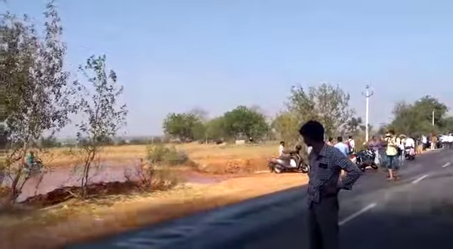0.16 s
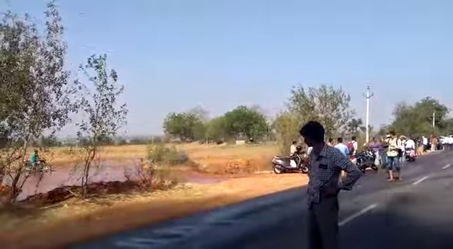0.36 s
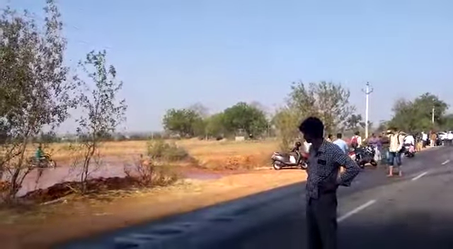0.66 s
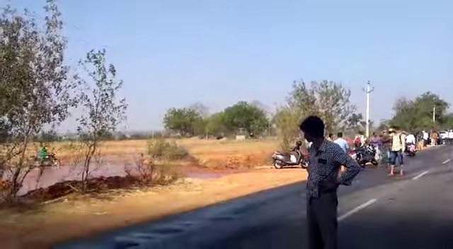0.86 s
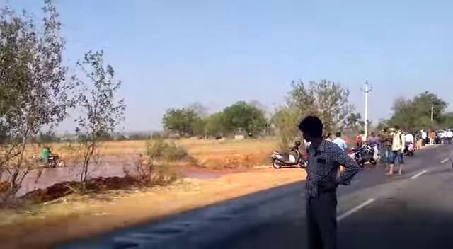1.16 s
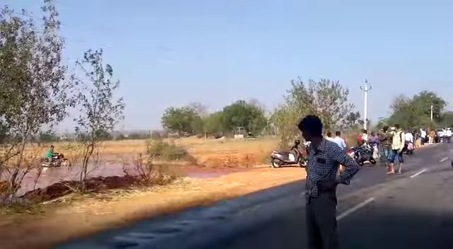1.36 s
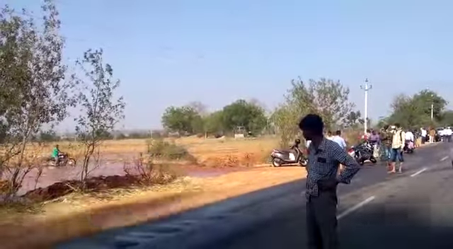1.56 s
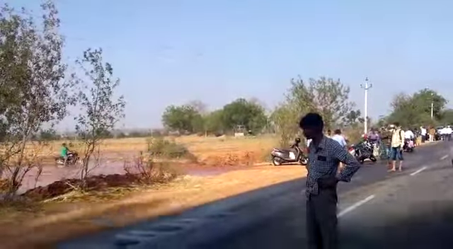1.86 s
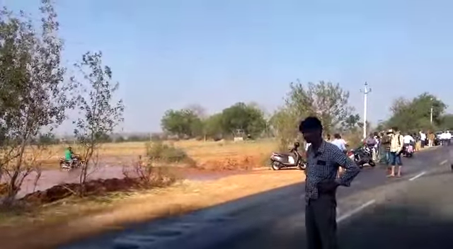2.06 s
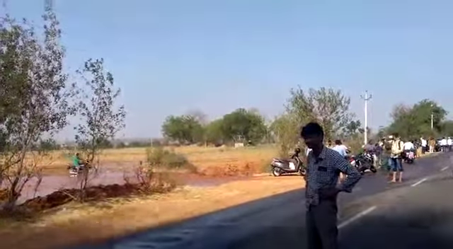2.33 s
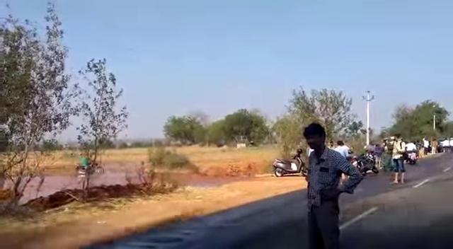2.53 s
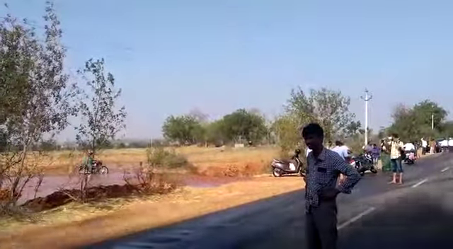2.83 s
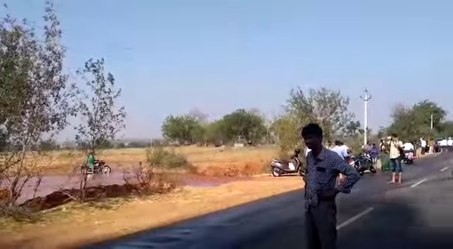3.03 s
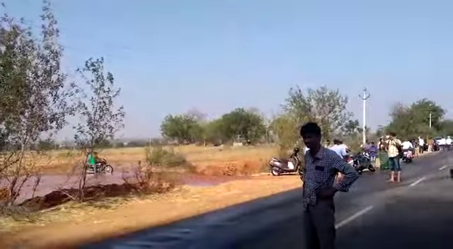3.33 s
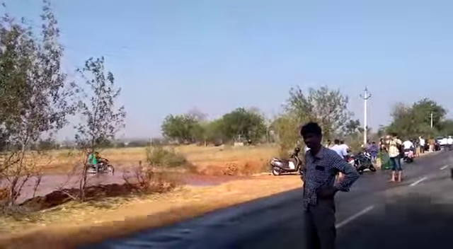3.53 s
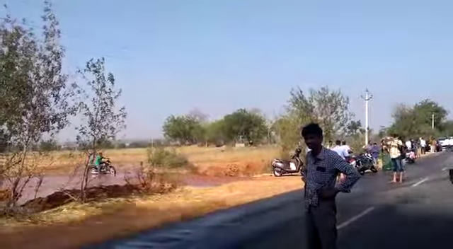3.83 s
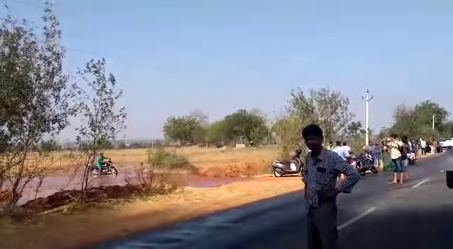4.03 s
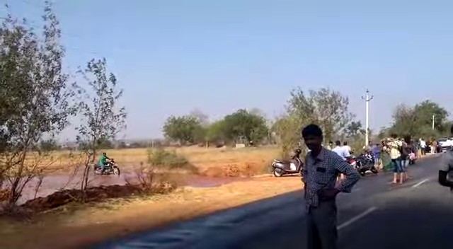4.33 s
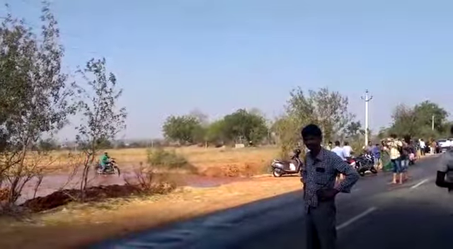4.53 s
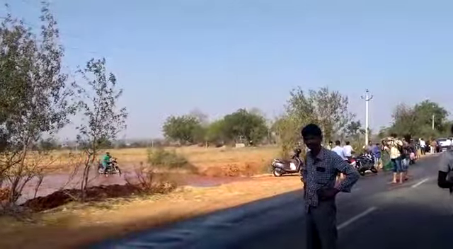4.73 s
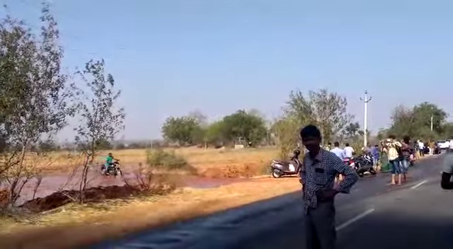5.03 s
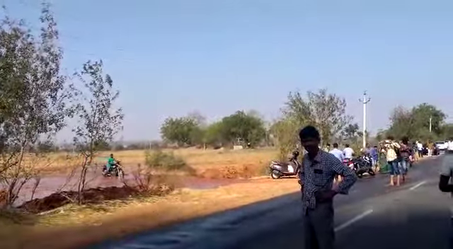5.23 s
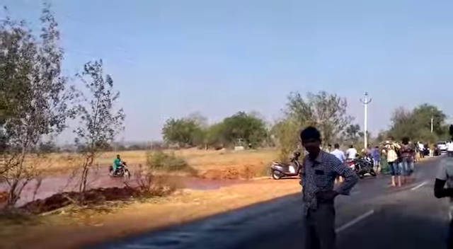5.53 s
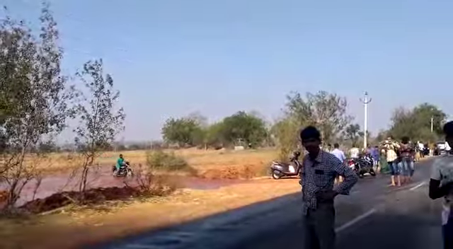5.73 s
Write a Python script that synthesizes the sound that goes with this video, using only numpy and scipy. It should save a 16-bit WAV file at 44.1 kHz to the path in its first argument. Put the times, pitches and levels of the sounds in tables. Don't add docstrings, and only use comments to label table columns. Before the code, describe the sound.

A burst water main roars steadily across an open field, heard from the roadside on a hand-held phone: a dense, noisy rush like a waterfall, full in the low mids with a bright, hissing spray on top, flickering and surging in short swells. From about 0.2 to 2.4 seconds, gusts batter the microphone with deep rounded thuds, quick slaps and brief whipping swishes, clustered at 0.25-0.7, 1.0-1.4 and 2.0-2.4. The rush dips after strong gusts, most deeply at 2.4, then creeps back over about a second. A short low splat falls near 1.75. From 3 to 5.4 the wind is mostly quiet and the water is clear and fuller, swelling around 4.1 and 4.7, with a faint splat at 4.1, a softer one at 4.6, the loudest hollow one at 4.7 and another at 5.2. Wind slaps again at 5.5, with lighter buffeting to the end.

```python
import sys
import numpy as np
from scipy import signal
from scipy.fft import rfft, irfft, next_fast_len
from scipy.io import wavfile
from scipy.ndimage import uniform_filter1d

SR = 44100
rng = np.random.default_rng(int(sys.argv[2]) if len(sys.argv) > 2 else 0)


def file_out(sig):
    cols = np.atleast_2d(sig).T
    lim = np.clip(cols, -1, 1)
    pcm = np.round(lim * 32767).astype(np.int16)
    wavfile.write(sys.argv[1], SR, pcm)


def boost_factor(decibels):
    exponent = np.asarray(decibels, float) / 20
    return 10 ** exponent


N = 259881
SIZE = next_fast_len(N + 4096)
HZ = np.maximum(np.arange(SIZE // 2 + 1) * SR / SIZE, 1.)
COARSE_S = np.arange(0, N / SR + .002, .002)

PORT_LAG_S, PORT_TURN_RAD = .000409, .52
LATE = -np.exp(-2j * np.pi * HZ * PORT_LAG_S - 1j * PORT_TURN_RAD * HZ / (HZ + 500))


def along_hz(table):
    hz, value = np.transpose(table)
    return np.interp(np.log(HZ), np.log(hz), value)


def along_time(table):
    s, *columns = np.transpose(table)
    return [np.interp(np.arange(N) / SR, s, column) for column in columns]


def unit(x):
    return x / np.sqrt(np.mean(x ** 2))


def walk(rate_hz):
    hold = int(SR / rate_hz)
    steps = np.repeat(rng.standard_normal(N // hold + 1), hold)
    slewed = uniform_filter1d(uniform_filter1d(steps, hold), hold)[:N]
    return unit(slewed - uniform_filter1d(slewed, size=4 * hold))


def cross(front, rear):
    return np.array([rear + LATE * front, front + LATE * rear])


def front_only(front, left_db):
    late = irfft(rfft(front) * LATE, SIZE)
    return np.array([boost_factor(left_db) * late, front])


# start_s (middle of swell), rush_db, fine_spray_db, half_length_s
SURGES = [(.344, 2, 0.5, 0.045), (0.483, 2.5, -1, 0.055), (0.635, 0, 1.5, 0.031), (0.927, 1.5, 0.5, 0.088),
          (1.03, -0.5, 2.5, .04), (1.398, 0.5, 2, .2), (1.687, 1.5, 2.5, 0.017), (1.833, 1, 1, 0.12),
          (2.1, 0.5, 0.5, 0.035), (2.286, 3, -1.5, 0.057), (2.72, 2, -2, 0.029), (2.893, 1, 0, .08),
          (3.498, 0.5, 0, .1), (3.82, 2, -1, 0.085), (4.045, 4.5, -2, 0.025), (4.121, 5, -1.5, 0.016),
          (4.21, -0.5, -0.5, 0.046), (4.422, 2, -1, 0.072), (4.604, 0, -0.5, 0.02), (4.932, 2, 0, 0.018),
          (4.709, 4.5, -3, 0.013), (4.82, -1, 0, .03), (5.177, 2, -2, 0.12), (5.71, 3.5, -1, 0.071),
          (5.86, 3.5, -0.5, 0.031)]
RUSH_DB, SPRAY_DB = -24.5, 2.5


def surging():
    s, rush_db, spray_db, half = np.transpose(SURGES)
    swell = np.exp(-.5 * ((COARSE_S[:, None] - s) / half) ** 2)
    return along_time(np.c_[COARSE_S, RUSH_DB + swell @ rush_db, SPRAY_DB + swell @ spray_db])


# start_s, gain_db it drops to
DUCKS = [(-.05, -4), (.22, -4), (.39, -6), (.56, -5), (.65, -5.5), (1.0, -3.5), (1.135, -6), (1.19, -7.5),
         (1.25, -6), (1.76, -6), (1.95, -4), (2.18, -6), (2.395, -12), (2.45, -11.5), (5.465, -5),
         (5.53, -6)]
DUCK_S, RECOVER_DB_PER_S = 0.01, 11


def ducking():
    s, db = np.transpose(DUCKS)
    since = COARSE_S[:, None] - s
    recovering_db = np.minimum(db + RECOVER_DB_PER_S * since, 0)
    deepest_db = np.where(since < 0, 0, recovering_db).min(axis=1)
    gain_db = along_time(np.c_[COARSE_S, deepest_db])[0]
    keep = np.exp(-1 / (DUCK_S * SR))
    return signal.lfilter([1 - keep], [1, -keep], gain_db - gain_db[0]) + gain_db[0]


def splashes(rate_hz, spread_db, drops_db):
    hit, size = rng.random(SIZE), rng.exponential(size=SIZE)
    sign, blur = rng.standard_normal(SIZE), rng.standard_normal(SIZE)
    drops = (hit < rate_hz / SR) * boost_factor(spread_db * np.minimum(size, 3.5)) * np.sign(sign)
    return rfft(blur + boost_factor(drops_db) * unit(drops))


# pitch_hz, level_db (per Hz)
RUSH_COLOUR = [(30, -30), (60, -1), (150, 6), (300, 4.5), (600, 2), (1500, 1), (2500, 0.5), (4500, -3),
               (7000, -3), (9000, 0.5), (11000, 3.5), (12300, 1), (13200, -2.5), (14300, -7)]
# pitch_hz, share_0_to_1
ALIKE = [(40, .1), (120, .4), (300, .7), (700, .65), (1100, .6), (1600, .25), (2300, .02), (5000, .03),
         (15000, .02)]
# pitch_hz, share_0_to_1
SCATTERED = [(40, 0.34), (300, 0.18), (1200, .03), (2500, 0.05), (3600, 0.13), (4300, 0.33), (5000, 0.08),
             (6000, 0.17), (7000, 0.49), (9000, 0.62), (15000, 0.2)]
# pitch_hz, share_0_to_1
REAR = [(60, .75), (300, 0), (900, 0.33), (1700, 0), (2900, 0.69), (4100, 0), (5300, 0), (8000, 0.24),
        (15000, 0)]
# pitch_hz, left_minus_right_db
SHADE = [(60, 11.5), (110, -1.5), (200, -5), (370, -3), (680, -3), (1250, 0), (2290, -2.5), (3500, -3),
         (4100, -5.5), (7690, -6), (14100, -6.5)]


def water():
    flow_db, spray_db = surging()
    alike = np.clip(along_hz(ALIKE), 0, 1)
    loose = np.clip(along_hz(SCATTERED), 0, 1 - alike)
    behind = np.clip(along_hz(REAR), 0, 1)
    front, rear, both, left, right = (splashes(rate_hz=900, spread_db=3.5, drops_db=-12.0) for _ in range(5))
    direct = cross(np.sqrt(1 - behind) * front, np.sqrt(behind) * rear)
    direct = np.sqrt(np.maximum(1 - alike - loose, 0)) * direct
    ports = np.sqrt(alike) * both + direct + np.sqrt(loose) * np.array([left, right])
    shade_db = along_hz(SHADE)
    ports = ports * boost_factor(along_hz(RUSH_COLOUR) + np.array([shade_db, -shade_db]) / 2)
    out, surge, near = 0, walk(40), walk(28)
    for centre_hz in 50 * 2 ** (np.arange(18) / 2):
        octaves = np.log2(np.maximum(HZ, 50) / centre_hz)
        window = np.cos(np.pi * np.clip(octaves, -.5, .5))
        near = unit(0.8 * near + 0.6 * walk(28))
        spray = np.clip(np.log2(centre_hz / 6000.) / .7, 0, 1)
        gain_db = 0.3 * surge + .4 * near + 0.55 * walk(30) + spray * (spray_db - 2.0)
        out = out + boost_factor(gain_db) * irfft(ports * window ** 2, SIZE)[:, :N]
    return unit(out) * boost_factor(flow_db + ducking() + 5.0)


def tents(rows, rise_db, fall_db, floor_db):
    s, db = np.transpose(rows)
    since = COARSE_S[:, None] - s
    each_db = db - np.maximum(-rise_db * since, fall_db * since)
    peaks_db = 10 * np.log10(np.sum(boost_factor(2 * each_db), axis=1) + 1e-12)
    peaks_db = along_time(np.c_[COARSE_S, peaks_db])[0]
    return 10 * np.log10(boost_factor(2 * peaks_db) + boost_factor(2 * floor_db))


def gust(colour, level_db, flutter_hz, flutter_db, even, rear_db, left_db):
    tint = boost_factor(along_hz(colour))
    front, rear = (unit(irfft(rfft(rng.standard_normal(SIZE)) * tint, SIZE)) for _ in range(2))
    swing = np.sqrt(uniform_filter1d(uniform_filter1d(front ** 2, size=900), size=900) + 1e-3)
    front = unit(front / swing ** even)
    ports = (front_only(front, left_db) + boost_factor(rear_db) * rear)[:, :N]
    return ports * boost_factor(level_db + flutter_db * walk(flutter_hz))


# pitch_hz, level_db (per Hz)
THUD_COLOUR = [(15, -48), (30, -20), (60, -5), (110, 0), (170, -2.5), (280, -11), (480, -26), (1200, -55)]
# start_s, level_db
BREEZE = [(0, -27), (.16, -23), (.3, -29), (.73, -22), (.83, -30), (.99, -29), (1.1, -26), (1.26, -27.5),
          (1.5, -20), (1.75, -27), (1.92, -25.5), (2.08, -23), (2.44, -26), (2.56, -33), (2.73, -26),
          (3.06, -42), (4.6, -43), (5.89, -24.5)]
WAKE_DB, WAKE_DB_PER_S = -10, 253


def thuds():
    wakes = [(s, db + WAKE_DB) for s, db, hz in SLAPS]
    level_db = tents(wakes, WAKE_DB_PER_S, WAKE_DB_PER_S, along_time(BREEZE)[0])
    return gust(THUD_COLOUR, level_db, flutter_hz=40, flutter_db=1.5, even=.9, rear_db=-19, left_db=-1.2)


# start_s (middle of slap), peak_db, pitch_hz
SLAPS = [(0.256, -5.5, 120), (0.307, -9.7, 110), (0.35, -7.3, 130), (0.398, -8.9, 170), (0.47, -8.3, 200),
         (0.52, -7.1, 110), (0.586, -11.5, 120), (0.621, -8.4, 170), (0.655, -7.1, 190), (1.031, -8.5, 160),
         (1.136, -5.4, 230), (1.175, -6.9, 180), (1.322, -7.6, 120), (1.378, -12.1, 160),
         (1.557, -10.1, 130), (1.791, -6.5, 140), (2.055, -6.7, 140), (2.138, -10.2, 130),
         (2.183, -6.2, 140), (2.234, -6.4, 190), (.865, -14, 110), (2.388, -7, 130), (2.403, -3.5, 220),
         (5.486, -6.7, 160), (5.52, -10.9, 160), (2.965, -15, 110), (4.175, -20, 120), (4.93, -13, 100),
         (5.41, -15, 130), (5.665, -14, 170)]


def slaps(cycles, left_db):
    front, busy, t = np.zeros(SIZE), np.zeros(SIZE), np.arange(SIZE) / SR
    for (s, db, hz), turn in zip(SLAPS, rng.random((len(SLAPS), 1))):
        near = slice(int((s - .04) * SR), int((s + .04) * SR))
        since = t[near] - s
        hump = np.exp(-.5 * (since * hz / cycles) ** 2)
        front[near] += boost_factor(db) * hump * np.cos(2 * np.pi * (hz * since + turn))
        busy[near] = np.maximum(busy[near], hump)
    return front_only(front, left_db)[:, :N], busy[:N]


# pitch_hz, level_db (per Hz)
SWISH_COLOUR = [(120, -7), (250, -1), (330, -1.5), (500, -4), (800, -18), (1300, -19), (3000, -51)]
# start_s (moment of peak), peak_db
WHIPS = [(.27, -32), (.38, -41), (.469, -28), (.663, -21.5), (1.03, -45), (1.127, -20.5), (1.18, -27.5),
         (1.43, -29), (1.686, -36), (1.8, -52), (2.03, -28), (2.13, -34), (2.22, -28.5), (2.4, -24.5),
         (2.72, -45), (5.5, -27.5), (5.66, -36)]


def whips():
    level_db = tents(WHIPS, rise_db=267, fall_db=298, floor_db=-58.5)
    return gust(SWISH_COLOUR, level_db, flutter_hz=55, flutter_db=3.0, even=.7, rear_db=-11, left_db=-2.5)


# start_s (middle of splat), level_db, pitch_hz (centre), length_s
SHEETS = [
    (1.752, -23, 800, .007),
    (4.115, -31, 1400, .01),
    (4.63, -25, 1200, .02),
    (4.706, -16.5, 1050, .007),
    (5.18, -27, 900, .01),
]


def sheets():
    out, t = 0, np.arange(SIZE) / SR
    for s, db, hz, length in SHEETS:
        burst = rng.standard_normal(SIZE) * np.exp(-np.abs(t - s) / length)
        band = np.exp(-.5 * (np.log2(HZ / hz) / 0.26) ** 2)
        hollow = rfft(burst) * band * np.sqrt(SR / hz / 2)
        out = out + boost_factor(db) * cross(hollow, .45 * hollow)
    return irfft(out, SIZE)[:, :N]


def scene():
    big, busy = slaps(cycles=.55, left_db=-1.3)
    wind = (1 - .75 * busy) * boost_factor(-.6) * thuds() + boost_factor(1.5) * whips() + boost_factor(.3) * big
    return water() + sheets() + wind


def top_cut(x):
    return signal.sosfilt(signal.butter(12, 14290, fs=SR, output="sos"), x)


def record(dry):
    rounded = np.tanh(.4 * dry) / .4
    return top_cut(rounded)


dry = scene()
out = record(dry)
file_out(out)
```